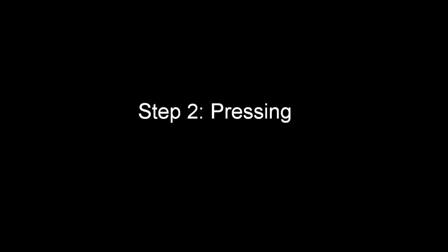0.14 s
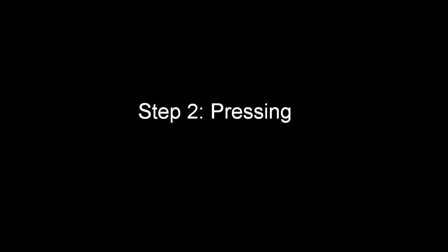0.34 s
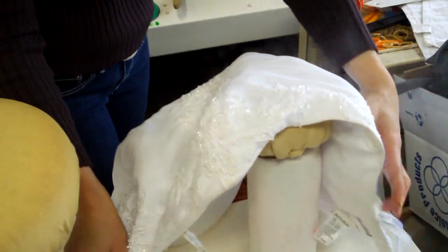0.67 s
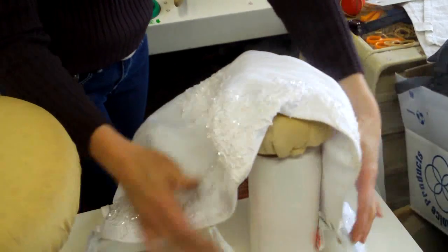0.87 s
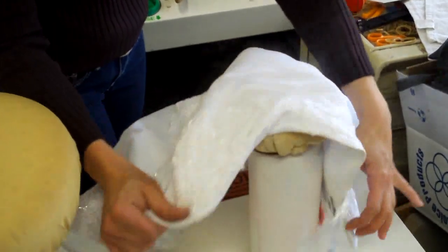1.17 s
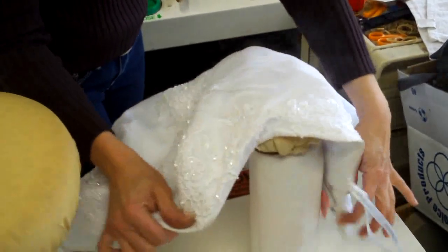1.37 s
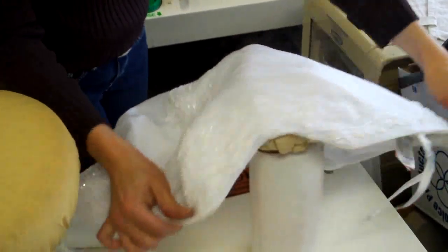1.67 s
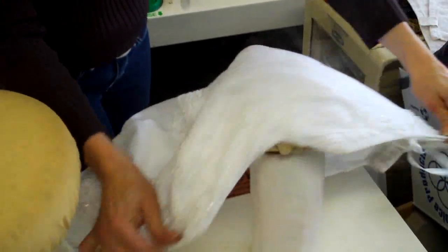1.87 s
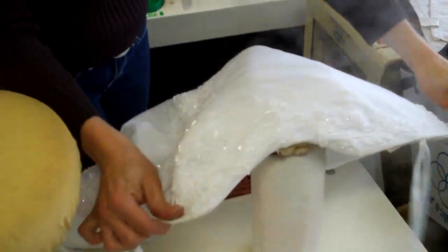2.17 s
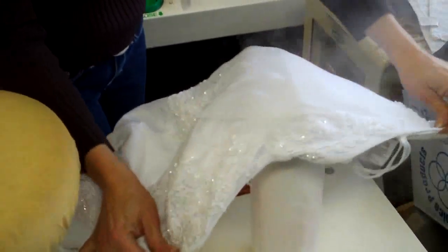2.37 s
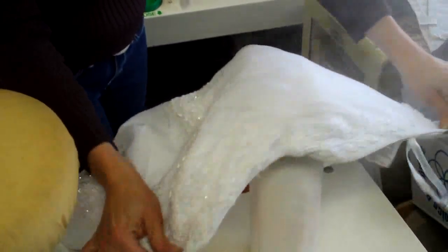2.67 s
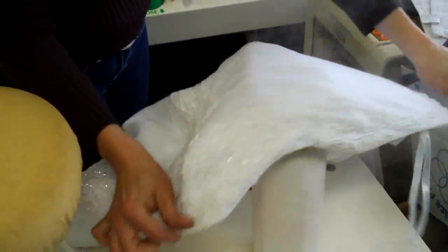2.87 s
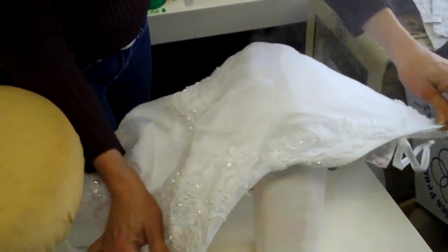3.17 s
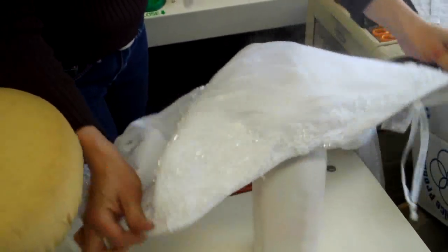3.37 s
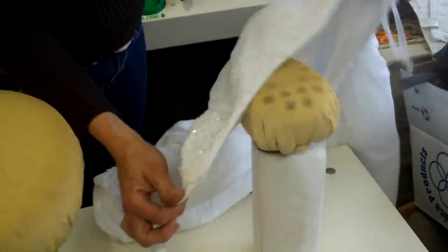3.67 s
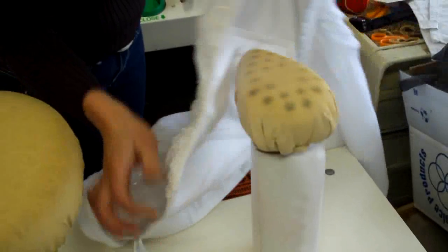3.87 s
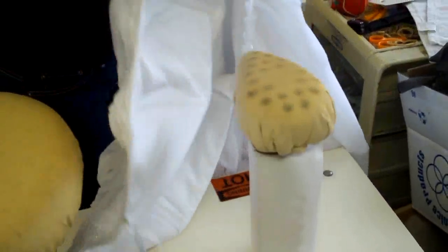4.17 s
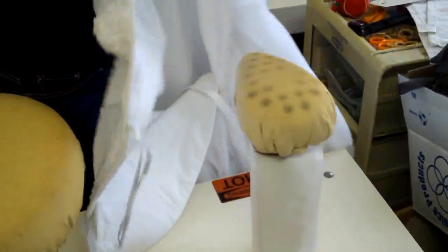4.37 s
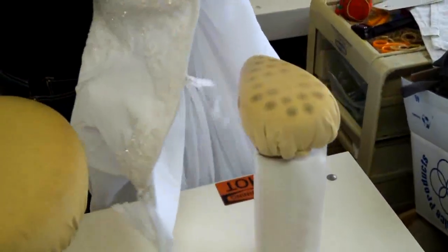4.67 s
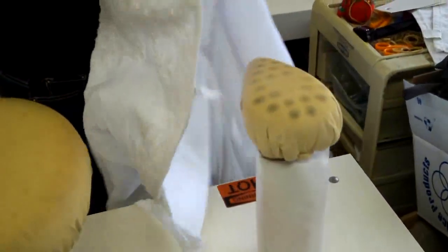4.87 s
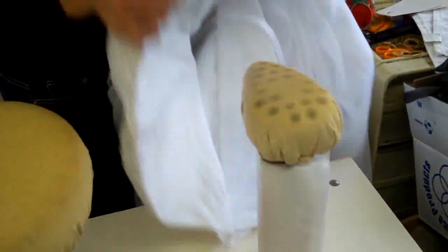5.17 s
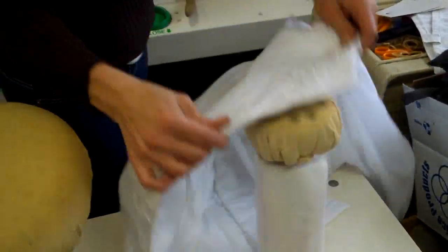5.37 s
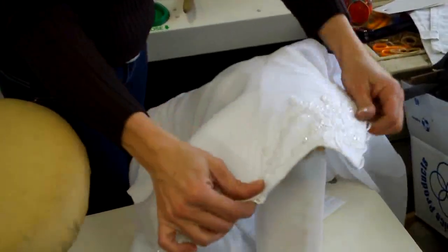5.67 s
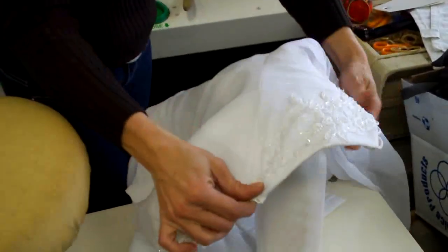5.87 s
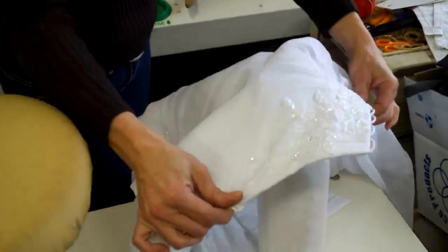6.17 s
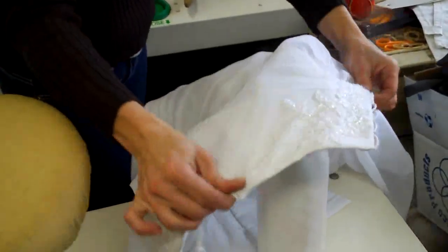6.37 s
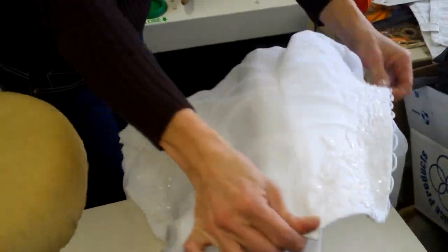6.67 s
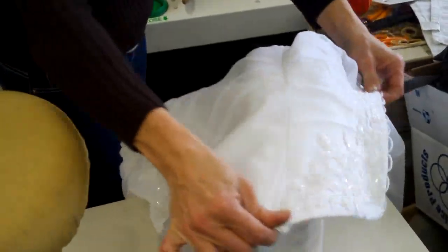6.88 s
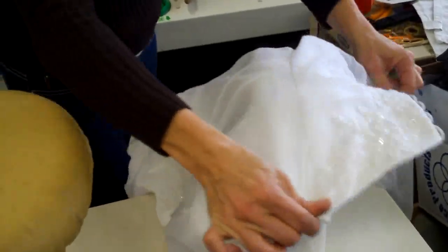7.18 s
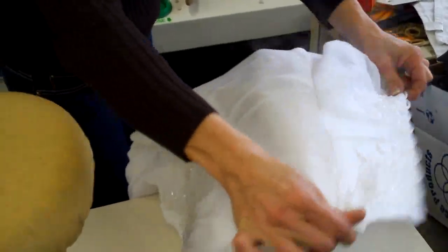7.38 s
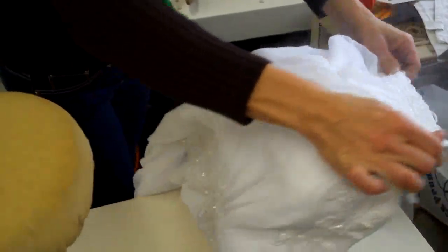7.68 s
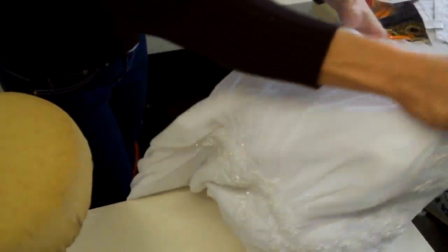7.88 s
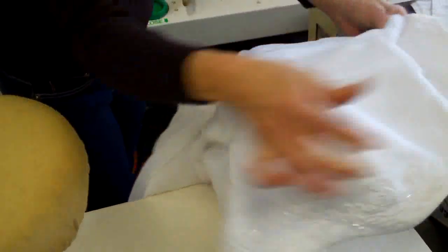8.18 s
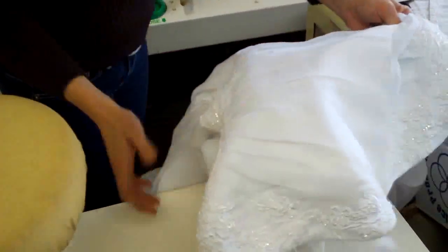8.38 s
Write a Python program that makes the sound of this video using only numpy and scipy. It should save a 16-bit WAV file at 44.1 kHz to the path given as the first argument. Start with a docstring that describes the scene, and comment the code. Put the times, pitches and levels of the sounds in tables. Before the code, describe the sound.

Silence, then a blower cuts in abruptly with airy rush and a very low drone that swells to a loud, steady hold. A distant steam jet hisses once, then three close whistling puffs rush through fabric. Heavy cloth swishes, a cluster of bumps hits the table, metal squeaks briefly, and two softer puffs follow. One microphone close to the work in a resonant pressing shop.

```python
"""After a silence, a far jet hisses once over a blower whose shaft drone swells up to a loud steady hold.
Place: a pressing shop, one microphone. The blower is sines for shaft and hum, with noise for its air.
A nearby steam valve gives short puffs: noise whistling in pipe resonances, then rushing through cloth.
Dragged cloth is dull noise, table bumps are dying sine modes, metal squeaks are very short sines."""
import sys
import numpy as np
from scipy import signal
from scipy.fft import rfft, irfft, next_fast_len
from scipy.io import wavfile
from scipy.ndimage import uniform_filter1d, map_coordinates

SR = 44100
rng = np.random.default_rng(int(sys.argv[2]) if len(sys.argv) > 2 else 0)


def waveform_to_disk(signal):
    """Save audio, clipped to [-1, 1], as 16-bit WAV at the path in sys.argv[1]."""
    frames = np.transpose(np.atleast_2d(signal))
    scaled = np.clip(frames, -1, 1) * 32767
    samples = np.round(scaled).astype(np.int16)
    wavfile.write(sys.argv[1], SR, samples)


N = 376173


def amp(db):
    """dB to gain."""
    return 10 ** (np.asarray(db) / 20)


def unit(x):
    """Scaled to rms 1."""
    return x / np.sqrt(np.mean(x ** 2) + 1e-20)


def along(points, hz):
    """(Hz, value) points read on a log frequency axis."""
    point_hz, values = np.transpose(points)
    return np.interp(np.log(hz + 1), np.log(point_hz + 1), values)


def curves(rows):
    """One value per sample for each column after the time in seconds."""
    times, *columns = np.transpose(rows)
    return np.array([np.interp(np.arange(N) / SR, times, column) for column in columns])


def wobble(rate):
    """A smooth random curve, rate knots a second."""
    knots = rng.standard_normal(int(N * rate / SR) + 4)
    return map_coordinates(knots, [np.arange(N) * rate / SR])


def filtered(x, response):
    """x times a response of frequency."""
    m = next_fast_len(N + 8192)
    return irfft(rfft(x, m) * response(np.fft.rfftfreq(m, 1 / SR)), m)[..., :N]


def bell(hz, centre_hz, width_hz):
    """Resonance shape: 1 at the centre, one half at half the width to either side."""
    return 1 / (1 + (2 * (hz - centre_hz) / width_hz) ** 2)


def noise(response, patchy_db):
    """Turbulence of rms 1: coloured noise with patches of random gain in time and frequency."""
    cells = signal.stft(rng.standard_normal(N), nperseg=512)[2]
    patches = uniform_filter1d(rng.standard_normal(cells.shape), size=6, axis=0)
    patches = uniform_filter1d(patches, size=12, axis=1)
    patched = signal.istft(cells * amp(patchy_db * unit(patches)), nperseg=512)[1][:N]
    return unit(filtered(patched, response))


def swell(s, rise, held, fall):
    """Gain that rises to 1 at s, holds, and falls, straight in dB: 20 dB per rise or fall time."""
    t = np.arange(N) / SR - s
    return amp(-20 * (np.maximum(-t, 0) / abs(rise) + np.maximum(t - held, 0) / abs(fall)))


def plain(tone):
    """A spectrum as it stands, without the hall."""
    return lambda hz: amp(along(tone, hz))


def hall(tone):
    """A spectrum lifted at the hall's resonances."""
    # resonances of the machine hall: centre_hz, width_hz, lift_db
    hall_modes = [(54, 9, 8), (205, 25, 3), (276, 30, 6), (350, 40, 3), (430, 50, 3), (544, 70, 3),
                  (697, 60, 4), (860, 80, 2), (1220, 90, 4), (1384, 40, 4), (1722, 40, 3), (1850, 70, 2),
                  (2305, 50, 5), (2405, 80, 5.5), (2632, 50, 4), (2906, 50, 6), (2995, 80, 5),
                  (3200, 90, 5), (3370, 60, 2), (3800, 120, 3.5), (4050, 200, 3), (4470, 60, 4),
                  (4980, 60, 3.5), (5330, 90, 3), (6270, 110, 2), (7380, 200, 2), (7860, 250, 3),
                  (8460, 120, 2), (9270, 100, 3), (13200, 400, 2)]
    return lambda hz: amp(along(tone, hz) + sum(db * bell(hz, c, w) for c, w, db in hall_modes))


def motor():
    """The unbalanced shaft shakes the floor once a turn; the windings hum in slightly unsteady lines."""
    # blower rotation: time_s, turns_hz, level_db
    shaft = [(.7, 29.04, -34), (1.2, 28.88, -32), (2, 28.14, -23.5), (3.2, 28.76, -18.5), (4.2, 28.88, -16),
             (5.9, 28.78, -14.5), (7.1, 28.9, -14.5), (8.5, 28.73, -15.5)]
    # winding hum: pitch_hz, waver_hz (full swing, half to either side), level_db
    hum = [(119.5, 1.6, -33), (177.5, 2, -42), (696, 11, -50), (5996, 10, -56)]
    shaft_hz, shaft_db = curves(shaft)
    turn = 2 * np.pi * np.cumsum(shaft_hz) / SR
    sound = np.sqrt(2) * amp(shaft_db + 0.85 * wobble(5)) * np.sin(turn)
    for hz, waver_hz, db in hum:
        phase = 2 * np.pi * np.cumsum(hz + waver_hz * wobble(8) / 2) / SR
        sound += np.sqrt(2) * amp(db + 2.2 * wobble(6)) * np.sin(phase)
    return sound


def blower():
    """Air in the casing: rumble, rush and fizz; close standing waves ripple the fizz."""
    # spectra of the three layers: pitch_hz, density_db (relative, per Hz)
    rumble_tone = [(7.1, -36), (12, -5.5), (37, -9.5), (46, -8), (81, -18), (118, -16), (144, -20.5),
                   (168, -16.5), (277, -22.5), (322, -27.5), (450, -41), (580, -98), (990, -120)]
    rush_tone = [(240, -7), (400, -1.5), (440, -2.5), (490, -3.5), (711, -4), (1030, -6), (1230, -6),
                 (2160, -7.5), (2350, -6.5), (2620, -6.5), (2990, -6), (3580, -7.5), (7000, -7.5),
                 (9100, -39), (15400, -120)]
    fizz_tone = [(3820, -19.5), (6500, -22.5), (7340, -1.5), (7940, 1.5), (10400, -2.5), (11500, -2.5),
                 (13400, -7.5), (15300, -17.5)]
    # slow level courses: time_s, level_db
    rumble_level = [(.7, -22.5), (1.4, -22.5), (2.4, -24.5), (3.4, -22), (4.3, -23), (5.3, -22),
                    (6.2, -21.5), (6.9, -24), (7.4, -22), (8.5, -23.5)]
    fizz_level = [(.7, -34.5), (1.8, -33), (2.7, -31), (3.4, -33), (4.3, -34.5), (6.1, -35), (6.5, -33),
                  (7.2, -34), (7.6, -32.5), (8.5, -33)]
    rush_db = -29
    waves = rng.standard_normal(400)  # ripple knots from 0 Hz to SR / 2

    def rippled(hz):
        ripple_db = 2.4 * np.interp(hz, np.linspace(0, SR / 2, len(waves)), waves)
        return hall(fizz_tone)(hz) * amp(ripple_db)

    surge_db = 0.52 * wobble(6.1)  # shared by rush and fizz
    rumble_gain = amp(curves(rumble_level)[0] + 0.49 * wobble(7))
    fizz_gain = amp(curves(fizz_level)[0] + surge_db + 0.38 * wobble(4.8))
    rumble = rumble_gain * noise(hall(rumble_tone), patchy_db=0.5)
    rush = amp(rush_db + surge_db) * noise(hall(rush_tone), patchy_db=0.91)
    fizz = fizz_gain * noise(rippled, patchy_db=1.0)
    return rumble + rush + fizz


def far_jet():
    """A distant steam jet starts abruptly, grows to its peak and dies away as one hiss."""
    # spectrum of the hiss: pitch_hz, density_db (relative, per Hz)
    jet_tone = [(3000, -120), (4500, -4), (7500, 0), (9500, -1), (11400, 3.5), (13000, -3), (15300, -10),
                (16500, -120)]
    opens_s, opening_s = 0.94, 0.08
    peak_s, peak_db, rise_s, fall_s = 1.18, -24.5, 0.64, 0.48
    opening = swell(opens_s, opening_s, N / SR, 1)
    gain = amp(peak_db) * opening * swell(peak_s, rise_s, 0, fall_s)
    return gain * noise(plain(jet_tone), patchy_db=0.0)


def cloth():
    """The garment's weight slides over the table with a dull swish."""
    # strokes of heavy cloth: full_s, rise_s, held_s, fall_s, level_db
    drags = [(1.9, .1, 0.16, .1, -30.5), (4.002, .03, .005, .2, -24.5), (4.665, 0.14, .11, 0.12, -27.5),
             (6.03, .1, 0.092, .1, -31), (7.37, 0.049, 0.15, .1, -30.5)]
    # spectrum of the swish: pitch_hz, density_db (relative, per Hz)
    drag_tone = [(110, -120), (170, -5), (280, 0), (500, -4), (800, -12), (1300, -18), (2000, -120)]
    stroke = sum(amp(db) * swell(*shape) for *shape, db in drags)
    return stroke * noise(plain(drag_tone), patchy_db=2)


def table():
    """Bumps ring the table's modes at random strengths; hard ones favour the highs, which die first."""
    # bumps: start_s, level_db, t60_s (at 200 Hz), hardness_db (tilt per octave about 200 Hz)
    bumps = [(3.998, -17, 0.26, 2), (4.04, -22, 0.12, 4), (4.066, -24, 0.09, -8), (4.1, -28, .1, 3),
             (7.212, -20.5, 0.15, -3), (7.256, -21, 0.11, -3)]
    # ringing modes of the table: pitch_hz, level_db
    table_modes = [(92, 3), (160, 1.5), (206, 4), (232, -4), (280, 2), (334, -6), (431, -7.5), (571, -9),
                   (786, -18), (1055, -18), (1195, -22)]
    out, t = np.zeros(N + SR), np.arange(SR // 2) / SR
    chance = rng.standard_normal((len(bumps), len(table_modes), 2))
    for (s, db, t60, hard_db), luck in zip(bumps, chance):
        ring = np.zeros(len(t))
        for (hz, level), (strength, phase) in zip(table_modes, luck):
            start_db = level + hard_db * np.log2(hz / 200) + 1.2 * strength
            lost_db = 60 * t / t60 * (hz / 200) ** 0.34
            ring += amp(start_db - lost_db) * np.sin(2 * np.pi * hz * t + phase)
        onset = 1 - np.exp(-t / 0.007)
        out[round(s * SR):][:len(t)] += amp(db) * ring * onset
    return out[:N]


def squeaks():
    """Rubbing metal: very short steady sines, each under a flat-topped bell in time."""
    # squeaks: start_s, length_s (start and end lie at 1/e of the top), pitch_hz, level_db
    squeak_rows = [(3.863, 0.016, 9050, -28), (6.326, 0.021, 10860, -25), (6.35, 0.0098, 10860, -33),
                   (6.3, 0.011, 5450, -29), (6.292, 0.014, 3860, -27.5)]
    t = np.arange(N) / SR
    sound = np.zeros(N)
    for s, length, hz, db in squeak_rows:
        shape = np.exp(-(2 * (t - s - length / 2) / length) ** 4)
        sound += np.sqrt(2) * amp(db) * shape * np.sin(2 * np.pi * hz * t)
    return sound


def puff(s, rise, held, low_db, flare_db, high_db, lag, rush_db, spit_db):
    """Gains of one puff's four sounds; the rush arrives once the steam reaches the cloth."""
    fall_s = 0.15  # the valve closes
    burst_s, burst_fall_s = 0.018, 0.08  # the upper modes flare at the opening, then stay lower
    sag_db_per_s = 23  # the low whistle weakens as the pressure drops
    flow = swell(s, rise, held, fall_s)
    sag = amp(-sag_db_per_s * np.clip(np.arange(N) / SR - s, 0, held))
    low = amp(low_db) * flow * sag
    flare = amp(flare_db) * swell(s, rise, burst_s, burst_fall_s)
    high = np.maximum(flare, amp(high_db) * flow)
    rush = amp(rush_db) * swell(s + lag, rise, held - lag, fall_s)
    return np.array([low, high, rush, amp(spit_db) * flow])


def steam():
    """Each puff excites the valve pipe's roughly even modes, then rushes and spits through the cloth."""
    # puffs: open_s, rise_s, held_s, low_whistle_db, high_flare_db, high_held_db, rush_lag_s,
    # rush_db, spit_db
    puffs = [(1.955, .09, .17, -30, -28.5, -37, 0.038, -24.5, -33.5),
             (2.41, 0.09, 0.077, -28.5, -25, -34, 0.04, -27.5, -33),
             (2.785, 0.036, 0.11, -29.5, -24, -30.5, .03, -27.5, -30),
             (6.298, .02, .085, -32, -39, -40, 0.022, -28, -37),
             (7.395, .07, 0.11, -35, -37, -38, .01, -27, -34.5)]
    # valve pipe, first mode and upper modes: centre_hz, width_hz, level_db
    pipe_low = [(4090, 440, 0)]
    pipe_high = [(5800, 320, -1), (7580, 300, 0), (9200, 220, -8), (10750, 200, -7), (12200, 250, -7)]
    # spectra of the rush through cloth and of the spit: pitch_hz, density_db (relative, per Hz)
    rush_tone = [(250, -120), (350, -2), (1100, -0.5), (2000, -0.5), (3000, -1.5), (5000, -1.5),
                 (8000, -16), (11000, -120)]
    spit_tone = [(5000, -120), (6500, 4.5), (9000, -1), (12000, 1), (14000, -4), (15300, -14),
                 (16500, -120)]

    def pipe(modes):
        return lambda hz: sum(amp(db) * bell(hz, c, w) for c, w, db in modes)

    low, high, rush, spit = sum(puff(*row) for row in puffs)
    flutter = amp(0.74 * wobble(45))  # the flow stutters
    whistle = low * noise(pipe(pipe_low), patchy_db=1)
    whistle += high * noise(pipe(pipe_high), patchy_db=-0.5)
    through_cloth = rush * noise(hall(rush_tone), patchy_db=1.0)
    through_cloth += spit * noise(plain(spit_tone), patchy_db=3)
    return flutter * (whistle + through_cloth)


def scene():
    """One microphone feeds both channels."""
    mid = motor() + blower() + far_jet() + cloth() + table() + squeaks() + steam()
    return np.array([mid, mid])


def record(dry):
    """Silence until the sound is switched in; faint low noise parts the channels; a steep top cut."""
    # spectrum of the faint low noise that widens the stereo, opposite in the two channels:
    # pitch_hz, density_db (relative, per Hz)
    side_tone = [(18, -29), (30, 2), (32, 8), (85, -5), (178, -53), (189, -44), (300, -54), (390, -84),
                 (660, -120)]
    start_s, top_hz = 0.6525, 15300
    switch = np.clip((np.arange(N) / SR - start_s) / 0.002, 0, 1)
    side = amp(-55) * noise(plain(side_tone), patchy_db=0.5)
    heard = (dry + [side, -side]) * switch
    # the ratio is capped so that its high power stays finite
    return filtered(heard, lambda hz: 1 / (1 + np.minimum(hz / top_hz, 1.1) ** 1000))


dry = scene()
out = record(dry)
waveform_to_disk(out)
```